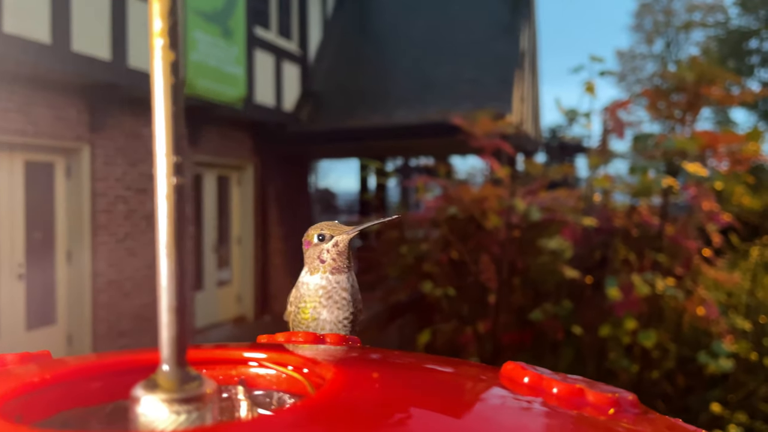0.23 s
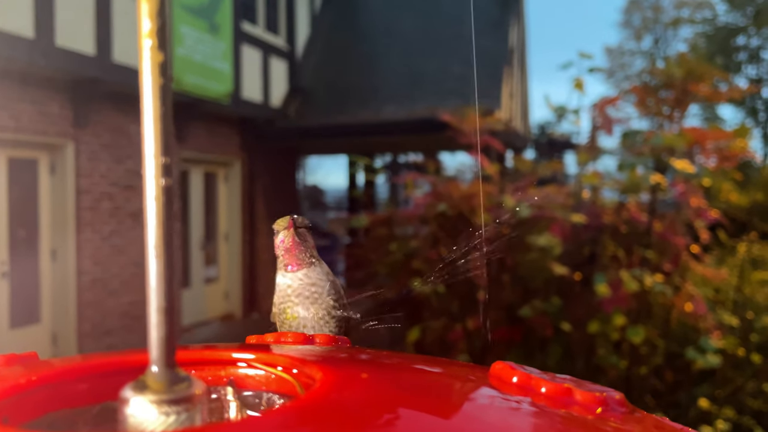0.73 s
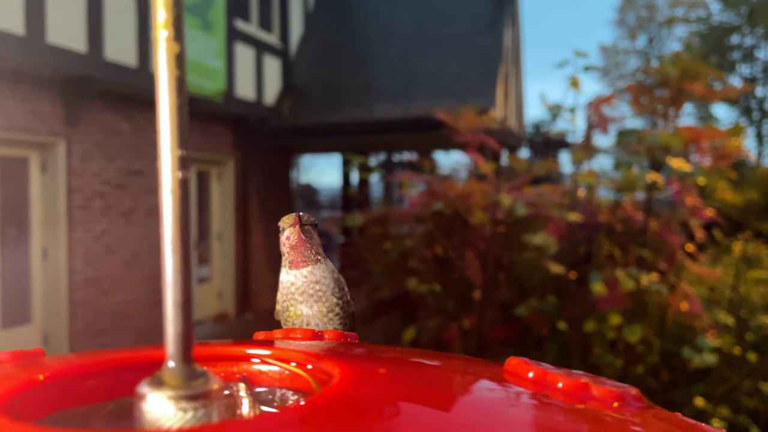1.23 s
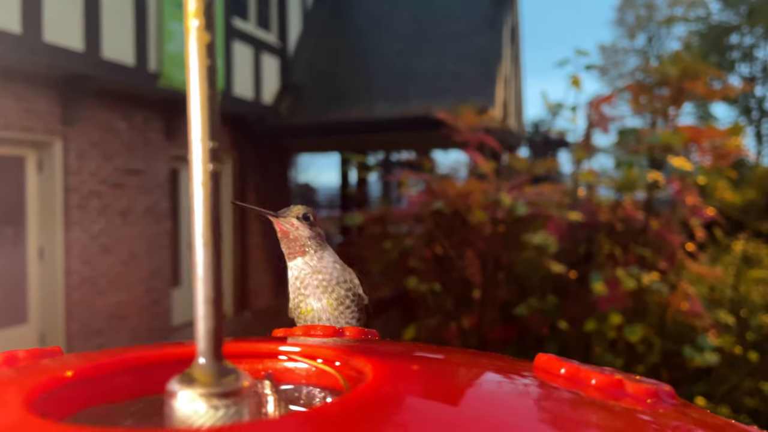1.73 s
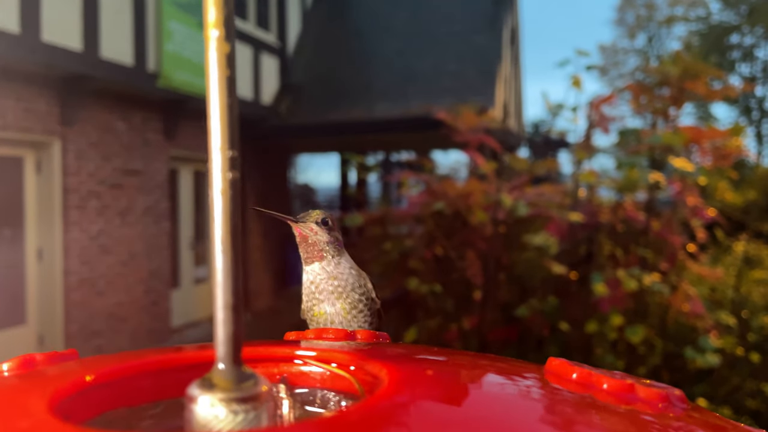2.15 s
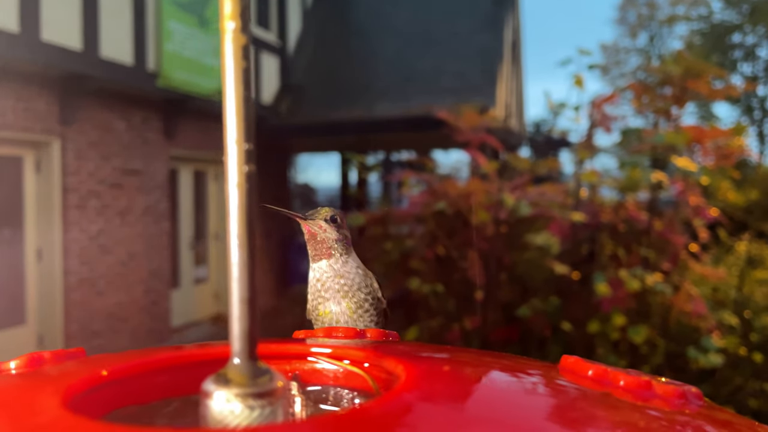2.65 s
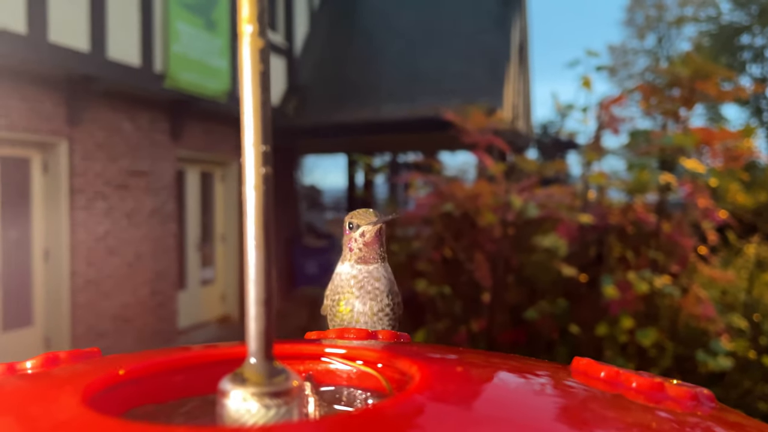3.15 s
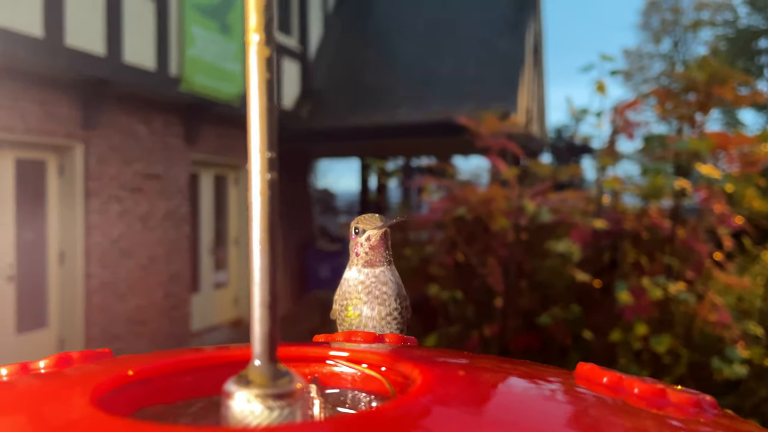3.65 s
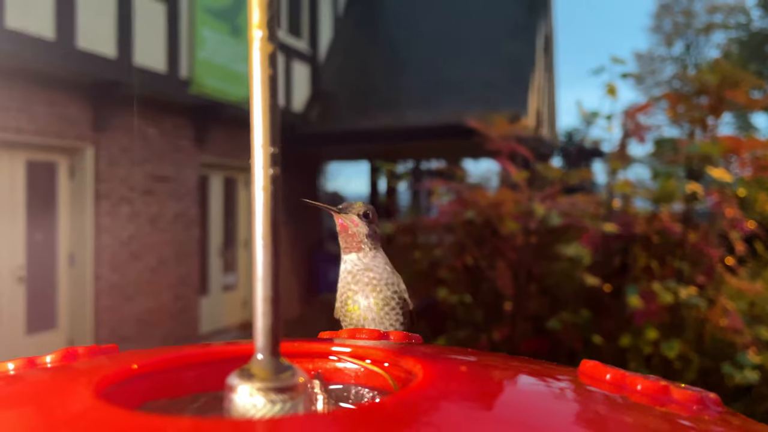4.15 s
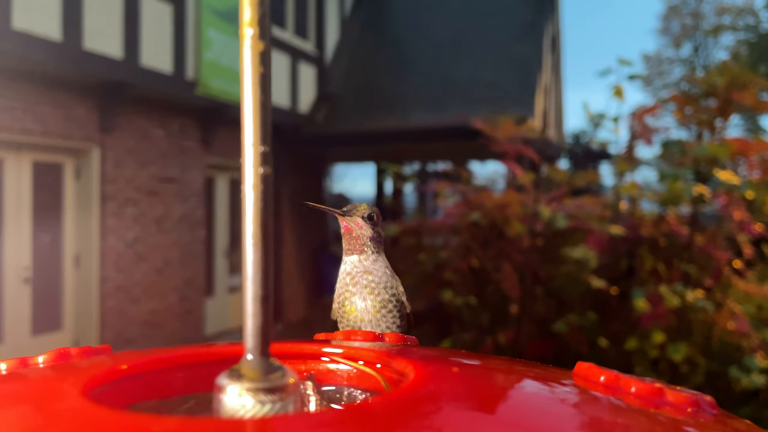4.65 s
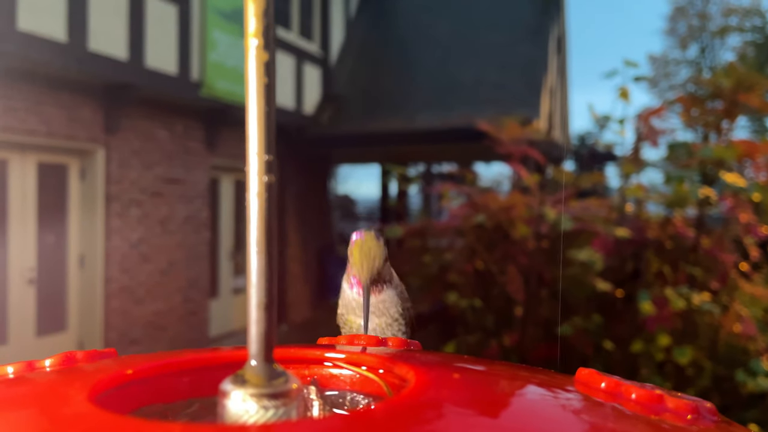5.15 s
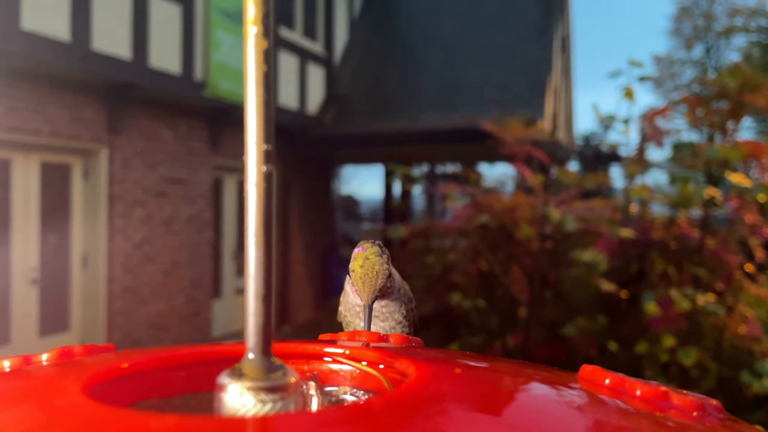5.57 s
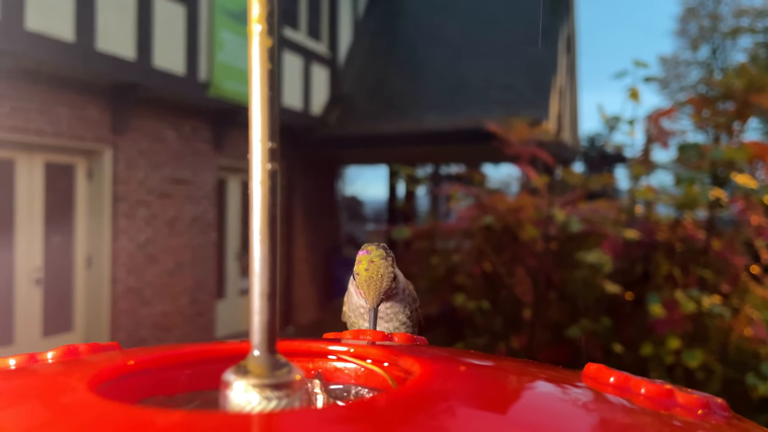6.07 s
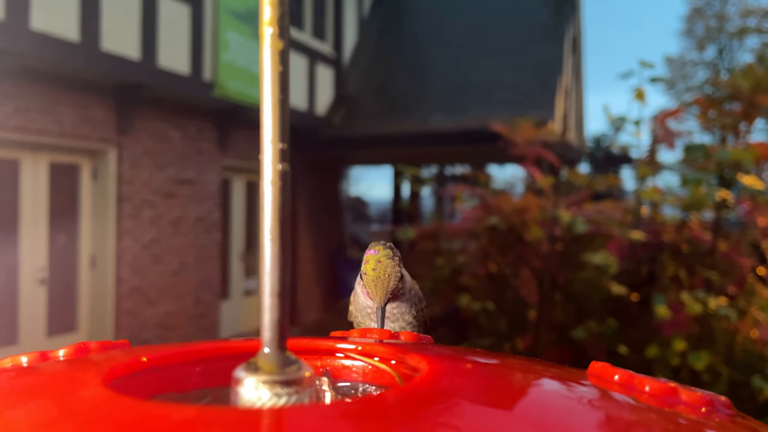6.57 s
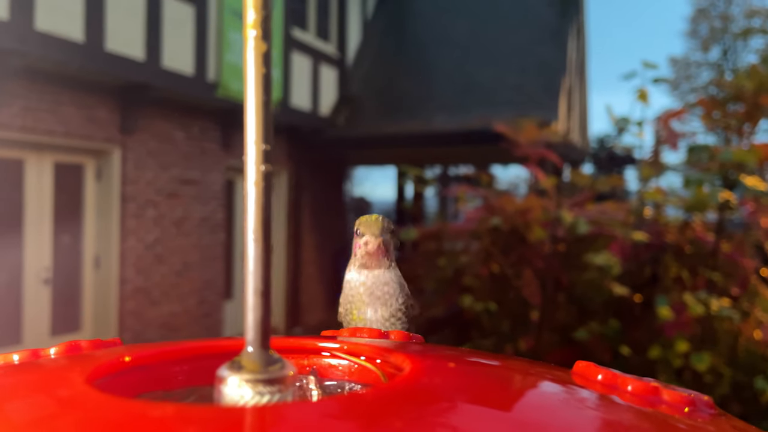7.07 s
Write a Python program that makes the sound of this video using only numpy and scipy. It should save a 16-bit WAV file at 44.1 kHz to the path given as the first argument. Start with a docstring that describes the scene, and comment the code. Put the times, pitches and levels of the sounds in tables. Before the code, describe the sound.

Very close to the microphone outdoors, a hummingbird opens with just over a second of loud, high trills alternating with slurred whistles. Afterwards it is mostly quiet: one short falling chip near three seconds, another near five, with scattered dry ticks and small knocks on a hollow plastic feeder. Underneath lie steady low rumble, soft hiss and faint patter, with a distant traffic-like hum rising at the end.

```python
"""Hummingbird at a feeder

A hummingbird on a plastic feeder, very close, gives a burst of chips: whistled slurs and fast trills.
Two single falling chips come later. The voice is a sine swept in pitch, harsher as it drops.
Ticks and knocks are short noisy clicks through resonances; they set the feeder's modes ringing.
Behind lie shaped noise for the garden rumble, random patter, low buffets, a thin whine and a late hum."""
import sys
import numpy as np
from scipy import signal
from scipy.fft import rfft, irfft
from scipy.io import wavfile

SR = 44100
rng = np.random.default_rng(int(sys.argv[2]) if len(sys.argv) > 2 else 0)


def materialize(psi):
    """Save the field psi as 16-bit PCM at rate SR to the path in sys.argv[1].

    A 1-D psi becomes a single channel; in a 2-D psi each row is a channel.
    """
    bounded = np.clip(np.atleast_2d(psi).T, -1, 1)
    quanta = np.round(bounded * 32767).astype(np.int16)
    wavfile.write(sys.argv[1], SR, quanta)


N = 322371
TIME = np.arange(N) / SR
CUTOFF_HZ = 8100


def from_db(db):
    """Decibels to gain."""
    return 10 ** (np.asarray(db) / 20)


def rms_one(x):
    """Scale to rms 1."""
    return x / np.sqrt(np.mean(x ** 2) + 1e-20)


def butter(x, hz, kind, order=2):
    """Causal Butterworth filter."""
    sos = signal.butter(order, np.clip(hz, 10, .45 * SR), kind, fs=SR, output="sos")
    return signal.sosfilt(sos, x + 1e-18)


def flutter(hz, size):
    """Low-passed noise: a random wobble up to a given rate, rms 1."""
    settle = SR // 4
    noise = rng.standard_normal(size + settle)
    return rms_one(butter(noise, hz, "low")[settle:])


def add(out, start_s, sound):
    """Mix a sound in at a time."""
    i = max(int(start_s * SR), 0)
    out[i:i + len(sound)] += sound[:max(N - i, 0)]


def fade(t, length, attack, release):
    """Straight attack, hold and release, as a gain."""
    return np.clip(np.minimum(t / attack, (length - t) / release), 0, 1)


def ring(x, hz, t60_s):
    """Two-pole mode: a unit click sets off a decaying sine of height 1."""
    r = from_db(-60 / (t60_s * SR))
    w = 2 * np.pi * hz / SR
    return signal.lfilter([0, np.sin(w)], [1, -2 * r * np.cos(w), r * r], x + 1e-18)


def resonance(x, hz, q):
    """Single band-pass resonance."""
    b, a = signal.iirpeak(hz, max(q, .4), fs=SR)
    return signal.lfilter(b, a, x)


def narrow_band(hz, width_hz):
    """Unsteady tone: sine and cosine with independent random amplitudes; rms about 0.7."""
    phase = 2 * np.pi * np.cumsum(hz * np.ones(N)) / SR
    in_phase = flutter(width_hz, N) * np.sin(phase)
    quadrature = flutter(width_hz, N) * np.cos(phase)
    return (in_phase + quadrature) / np.sqrt(2)


def garden(x, tail_db=-24, t60_s=0.31):
    """Discrete echoes from feeder, ground and wall, plus a decaying scatter from walls and leaves."""
    # Each row: delay in seconds, level in dB.
    echo_rows = [(.0009, -35), (.0017, -41.5), (.0026, -28), (.0043, -15), (0.0117, -36)]
    t = TIME[:SR // 2]
    scatter = rng.standard_normal(len(t)) * from_db(-60 * t / t60_s)
    scatter = scatter / np.sqrt(np.sum(scatter ** 2))
    out = x + from_db(tail_db) * signal.fftconvolve(x, scatter)[:N]
    for delay_s, db in echo_rows:
        add(out, delay_s, from_db(db) * x)
    return out


def air(level_db=-40, waver_db=1.77, rumble_db=-0.56, hiss_db=0.12):
    """Spectrally shaped noise: a steady rumble under a soft, slightly wavering hiss."""
    # Spectrum of the garden air. Each row: frequency in Hz, relative density in dB.
    spectrum = [(12, -28), (20, -0.5), (42, 2), (119, -12.5), (258, -18), (340, -16), (376, -17.5),
                (483, -18), (739, -16.5), (1280, -18), (1380, -19), (1570, -20.5), (4070, -28),
                (7240, -36.5), (8000, -44.5), (10400, -96.5), (17600, -120)]
    hz, db = np.transpose(spectrum)
    bins_hz = np.maximum(np.arange(N // 2 + 1) * SR / N, 1)
    colour = from_db(np.interp(np.log(bins_hz), np.log(hz), db))
    shaped = irfft(rfft(rng.standard_normal(N)) * colour, N)
    noise = from_db(level_db) * rms_one(shaped)
    low = butter(noise, 140, "low", order=1)
    hiss_gain = from_db(hiss_db + waver_db * flutter(23.4, N))
    return from_db(rumble_db) * low + (noise - low) * hiss_gain


def drone(hum_hz=242, width_hz=34, octave_below_db=-3):
    """Narrow noise bands: a faint whine all along, and a far hum, like traffic, that comes up near the end."""
    # Steady whine: frequency in Hz, level in dB.
    whine_hz, whine_db = (425, -67)
    start_s, rise_s, faint_db, loud_db = 6.07, 0.39, -61, -46.5
    level_db = np.interp(TIME, [start_s, start_s + rise_s], [faint_db, loud_db])
    hum = narrow_band(hum_hz, width_hz)
    hum = hum + from_db(octave_below_db) * narrow_band(hum_hz / 2, width_hz)
    return from_db(level_db) * hum + from_db(whine_db) * narrow_band(whine_hz, 5)


def patter(per_s=45, level_db=-55, spread_db=5.0, tilt=0.25):
    """Many faint ticks: random impulses of random size excite seven resonances."""
    out = np.zeros(N)
    pitches_hz = np.geomspace(600, 4000, num=7)
    for hz in pitches_hz:
        born = rng.random(N) < per_s / len(pitches_hz) / SR
        sizes = from_db(spread_db * np.minimum(rng.exponential(1, N), 2))
        signs = rng.choice([-1, 1], N)
        out += resonance(born * sizes * signs, hz, 1.33) / hz ** tilt
    return from_db(level_db) * rms_one(garden(out))


def buffets():
    """Soft buffets on the microphone: band-limited low noise under a Hann swell."""
    # Each row: centre in seconds, length at half height in seconds,
    # rms before the swell in dB, nominal top frequency in Hz.
    buffet_rows = [(0.039, 0.17, -39, 91), (1.665, 0.085, -36.5, 109), (1.769, .08, -35.5, 82),
                   (5.269, 0.0158, -32.5, 294), (5.492, 0.036, -41.5, 420)]
    out = np.zeros(N)
    for centre_s, length_s, level_db, top_hz in buffet_rows:
        n = int(2 * length_s * SR)
        puff = rms_one(butter(flutter(top_hz, n), [35, 1.24 * top_hz], "band"))
        puff = from_db(level_db) * puff * np.hanning(n)
        early = max(int((length_s - centre_s) * SR), 0)  # samples falling before time zero
        add(out, centre_s - length_s, puff[early:])
    return out


def syrinx(hz, level_db, second_db=-12, third_db=-18, other_side_db=-9, rasp=0.11, hiss_db=-20,
           clean_hz=4500, rough_hz=2400):
    """A whistle that is pure when high and turns harsh and rich in overtones as it drops."""
    n = len(hz)
    harsh = np.clip((clean_hz - hz) / (clean_hz - rough_hz), .03, 1)
    turn = 2 * np.pi * np.cumsum(hz) / SR
    phase = turn + rasp * harsh * flutter(810, n)
    second = from_db(second_db) * np.sqrt(harsh) * np.sin(2 * phase)
    third = from_db(third_db) * harsh * np.sin(3 * phase)
    # low notes: the other side of the syrinx joins at its own pitch, with sum and beat tones
    other_phase = 1.27 * turn + .7 * flutter(500, n)
    mixed = np.sin(other_phase) + .5 * np.sin(other_phase + phase)
    mixed = mixed + 0.12 * np.sin(2 * phase - other_phase)
    other = from_db(other_side_db) * harsh ** 2 * mixed
    breath = rms_one(butter(rng.standard_normal(n), [3000, 10000], "band"))
    hiss = from_db(hiss_db) * harsh * breath
    fundamental = np.sin(phase) * (1 + rasp * harsh * flutter(1300, n))
    tone = fundamental + second + third + other + hiss
    edges = signal.windows.tukey(n, min(.003 * SR / n, 1))  # 1.5 ms each
    return tone * from_db(level_db) * edges


def trill(length_s, mid_hz, level_db, swell_db, dip_db, swing_hz=900, overtone_db=-13):
    """The pitch warbles fast; each upstroke bursts out abruptly and fades over the top."""
    warbles_per_s, speed_up = 160, 0.1  # mean rate, before rounding to whole warbles; starts slow
    droop_hz, swell_power = 280, 2.4    # most of the swell comes early, of the droop late
    t = TIME[:int(length_s * SR)]
    n, u = len(t), t / length_s
    cycle = round(warbles_per_s * length_s) * (u - speed_up * u * (1 - u))
    cycle = cycle + .02 * flutter(110, n)
    closed = np.interp((cycle - .14) % 1, [0, .17, .28, .68], [1, 0, .08, 1])
    centre_hz = mid_hz - droop_hz * u ** 4
    hz = centre_hz - swing_hz * np.cos(2 * np.pi * cycle) + 110 * flutter(500, n)
    effort_db = level_db - swell_db * (1 - u) ** swell_power
    uneven_db = 1.2 * flutter(120, n)
    pulsed_db = effort_db + uneven_db - dip_db * closed
    return syrinx(hz, pulsed_db, second_db=overtone_db, other_side_db=-9, hiss_db=-8)


def slur(rows, ease=0.23):
    """The pitch swings from one turning point to the next, slowing at each."""
    s, hz, level_db = np.transpose(rows)
    t = np.arange(s.min(), s.max(), 1 / SR)
    point = np.arange(len(s))
    place = np.interp(t, np.sort(s), point)
    eased = place - min(ease, 1) * np.sin(2 * np.pi * place) / (2 * np.pi)
    return syrinx(np.interp(eased, point, hz), np.interp(place, point, level_db))


def whistle(length_s, held_s, first_hz, last_hz, lateness, warbles_per_s, depth_octaves, level_db):
    """A high note is held, then breaks into slow downward warbles while its crests sag."""
    edge_depth = 0.447  # warble depth at either end, as a share of that midway
    best_hz, loss_db_per_octave = 3470, 9  # loudest pitch, weaker to either side
    bill_hz, bill_q, bill_db = 3270, 11, -8.5
    t = TIME[:int(length_s * SR)]
    since_s = np.maximum(t - held_s, 0)
    u = since_s / (length_s - held_s)
    crest_hz = first_hz * (last_hz / first_hz) ** (u ** lateness)
    reach_octaves = depth_octaves * (1 - (1 - edge_depth) * (2 * u - 1) ** 2)
    hz = crest_hz * 2 ** (-reach_octaves * np.sin(np.pi * warbles_per_s * since_s) ** 2)
    loss_db = loss_db_per_octave * np.abs(np.log2(hz / best_hz))
    voice = syrinx(hz, level_db - loss_db, second_db=-11.5, other_side_db=-4, rough_hz=2450)
    # notes lingering near its pitch set the open bill ringing
    voice = voice + from_db(bill_db) * resonance(voice, bill_hz, bill_q)
    return voice * fade(t, length_s, attack=.0035, release=.007)


def stray_touches(per_s=2.2, peak_db=-29, spread_db=-2.0, mid_hz=1500, spread_octaves=0.71):
    """Tick rows for light touches, spread loosely at random over the whole time."""
    t60_s, push_db = 0.007, -49.5
    rows = []
    for k, (when, force, pitch) in enumerate(rng.uniform(-1, 1, (int(per_s * N / SR), 3))):
        start_s = (k + .5 + .5 * when) / per_s
        hz = mid_hz * 2 ** (spread_octaves * pitch)
        rows.append((start_s, peak_db + spread_db * force, hz, t60_s, push_db))
    return rows


def ticks(rattle=0.65, q=1.0, tone_q=3.7, tone=1.0, brightness=3.5):
    """Each touch is a click with a short rattle and a pitch of its own, and drives the feeder's modes."""
    # Clearer ticks and knocks. Each row: start in seconds, click peak in dB, centre in Hz,
    # rattle t60 in seconds, push on the feeder in dB.
    tick_rows = [ (0.6747, -26.5, 1110, 0.017, -31), (0.7231, -21.5, 2500, .003, -44),
                 (0.9954, -30, 2380, .004, -58), (1.3824, -22.5, 1210, 0.055, -40),
                 (1.73, -22.5, 1770, 0.011, -43), (2.0080, -23, 1100, .025, -47),
                 (2.0206, -24.5, 1390, .02, -42), (3.1589, -19.5, 2220, 0.02, -41),
                 (4.0224, -20.5, 2490, 0.006, -48), (4.1585, -19.5, 2330, 0.018, -28.5),
                 (4.1893, -27, 1520, .015, -40), (4.2600, -32, 6200, .045, -60),
                 (4.302, -25, 2800, 0.012, -52), (4.4778, -26, 1260, .015, -53),
                 (4.5280, -19.5, 1440, 0.028, -40.5), (5.0729, -25.5, 900, .038, -34),
                 (5.4087, -19.5, 674, 0.01, -50), (5.4524, -27, 1190, .004, -55),
                 (5.5405, -22.5, 1700, 0.029, -33.5), (5.5438, -14.5, 1440, 0.0092, -30.5),
                 (5.8078, -26, 2020, .021, -60), (6.0355, -23.5, 2070, 0.0091, -68),
                 (6.5080, -24, 760, 0.0082, -41), (7.2812, -25, 794, 0.004, -42.5), ]
    # Modes of the plastic feeder. Each row: frequency in Hz, gain in dB, t60 in seconds.
    feeder_modes = [(278, -12, 0.12), (414.7, -1.5, 0.11), (539, 3, 0.065), (758, -2, .035),
                    (942, -2, 0.056), (1080, 0.5, 0.036), (1450, -14.5, .05), (1526, -5.5, 0.056),
                    (2040, -17, 0.074), (2880, -14.5, 0.082)]
    out, pushes, t = np.zeros(N), np.zeros(N), TIME[:SR // 10]
    for start_s, peak_db, hz, t60_s, push_db in list(tick_rows) + stray_touches():
        contact = rattle * rng.standard_normal(len(t)) * from_db(-60 * t / t60_s)
        contact[0] += 2
        click = resonance(contact, hz, q) + tone * resonance(contact, hz, tone_q)
        click = butter(click, min(brightness * hz, CUTOFF_HZ), "low")  # lower touches are duller
        add(out, start_s, from_db(peak_db) * click / np.abs(click).max())
        add(pushes, start_s, from_db([push_db]))
    for k, (hz, db, t60_s) in enumerate(feeder_modes):
        out += (-1) ** k * from_db(db) * ring(pushes, hz, t60_s)  # signs alternate
    return out


def chip(length_s, first_hz, last_hz, level_db):
    """A plunge that lingers at the top and speeds up, swelling to its middle and dying at the bottom."""
    u = np.linspace(0, 1, int(length_s * SR))
    hz = first_hz * (last_hz / first_hz) ** (u ** 2.35)
    voice = syrinx(hz, level_db, second_db=-9, third_db=-19, other_side_db=-19, hiss_db=-11)
    return voice * fade(u, 0.95, attack=0.58, release=0.19)  # shares of the length


def throat(x, hz=3700, q=1.0, boost=0.082, gain_db=-1.28):
    """The windpipe and open bill favour the middle of the bird's range."""
    return from_db(gain_db) * (x + boost * resonance(x, hz, q))


def bird():
    """All calls through one throat: trills that close with a flick, whistles, single chips."""
    # Levels are ahead of the throat and of each call's own shaping.
    # Each row: start in seconds, end in seconds, mid pitch in Hz, level in dB, swell in dB,
    # dip between pulses in dB, gain of the closing flick in dB.
    trill_rows = [ (0.069, 0.116, 3100, -12.5, 17, 21, -15), (0.3146, 0.379, 3387, -13, 2, 13.5, -10.5),
                  (0.5488, 0.616, 3437, -9.5, 2.5, 14, -10.5), (0.806, 0.8545, 3360, -10.5, 10, 19, -8.5),
                  (1.0856, 1.1417, 3300, -13, 9.5, 14.5, -11), ]
    # Slower last swing of every trill. Each row: seconds after the trill, pitch in Hz, level in dB.
    flick_points = [(0, 2300, -3), (.0032, 3830, 1.5), (.008, 1740, -11), (.0115, 2800, -13.5)]
    # Each row: start in seconds, length in seconds, held part in seconds, first pitch in Hz,
    # last crest in Hz, lateness of the sag (power), warbles per second, depth in octaves, level in dB.
    whistle_rows = [ (0.2607, 0.057, 0.0093, 4940, 4770, 1.15, 67, .82, -13.5),
                    (0.511, 0.04, .0070, 4860, 3770, 0.67, 101, 0.31, -11.5),
                    (0.7359, .0505, .0095, 4800, 2404, .62, 46, .42, -10.5),
                    (1.0083, .0515, 0.0092, 4720, 2320, 2.5, 60.5, .78, -13), ]
    # Each row: start in seconds, length in seconds, first pitch in Hz, last pitch in Hz, level in dB.
    chip_rows = [(3.0866, .028, 4750, 777, -18.5), (5.0952, .0215, 4820, 868, -19)]
    out = np.zeros(N)
    for start_s, end_s, *shape, flick_db in trill_rows:
        add(out, start_s, trill(end_s - start_s, *shape))
        add(out, end_s, from_db(flick_db) * slur(flick_points))
    for start_s, *shape in whistle_rows:
        add(out, start_s, whistle(*shape))
    for start_s, *shape in chip_rows:
        add(out, start_s, chip(*shape))
    return throat(out)


def scene():
    """Bird and ticks close by, the background behind them."""
    close = garden(bird() + ticks())
    return (close + patter() + buffets() + air() + drone())[None]


def record(dry):
    """Steep elliptic low-pass: 0.1 dB ripple below the cut-off, at least 70 dB down in the stop band."""
    return signal.sosfilt(signal.ellip(12, .1, 70, CUTOFF_HZ, fs=SR, output="sos"), dry)


dry = scene()
out = record(dry)
materialize(out)
```